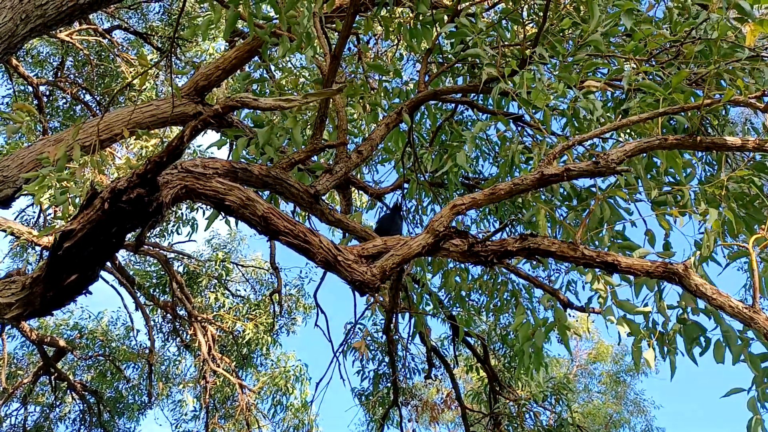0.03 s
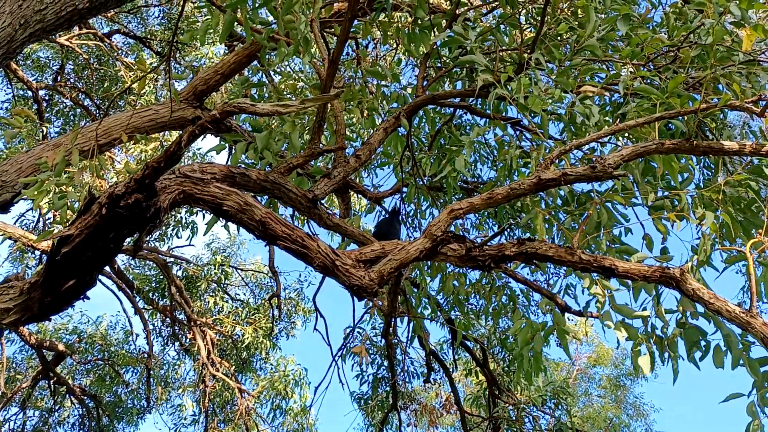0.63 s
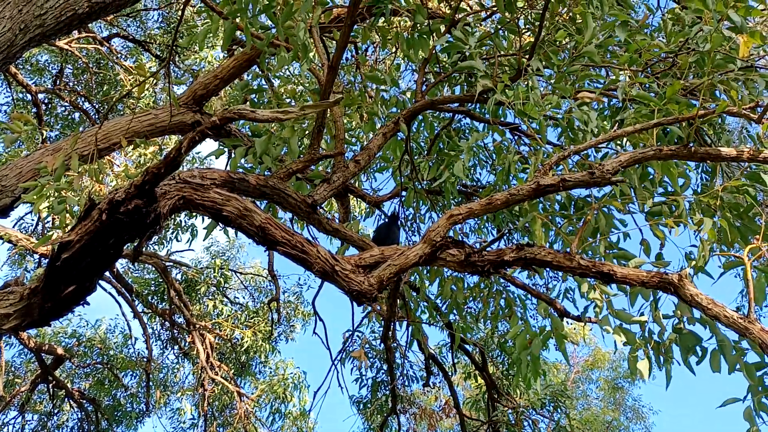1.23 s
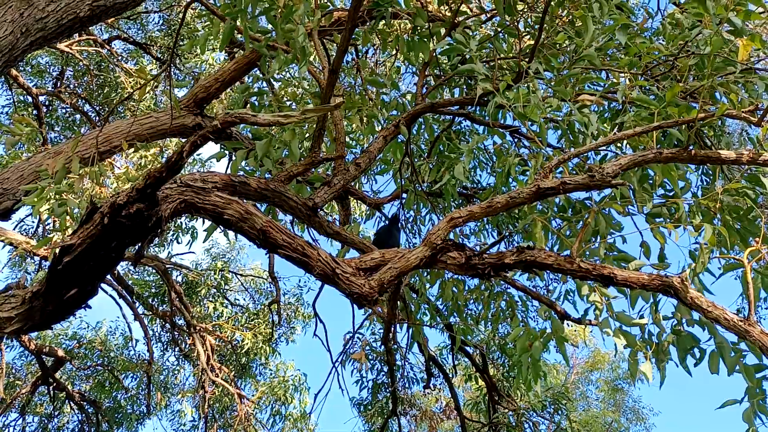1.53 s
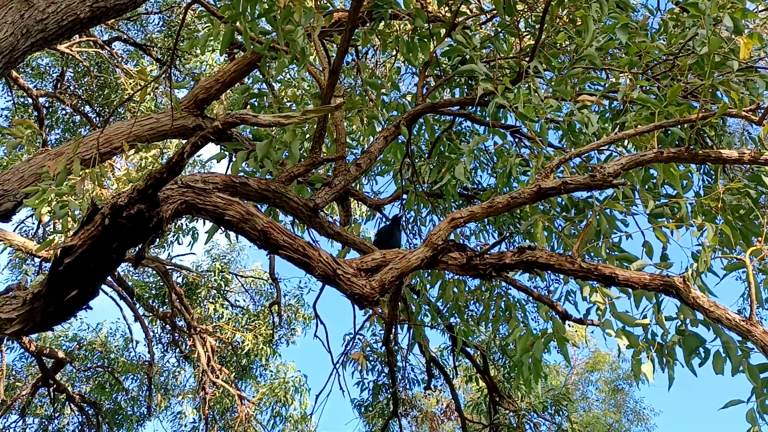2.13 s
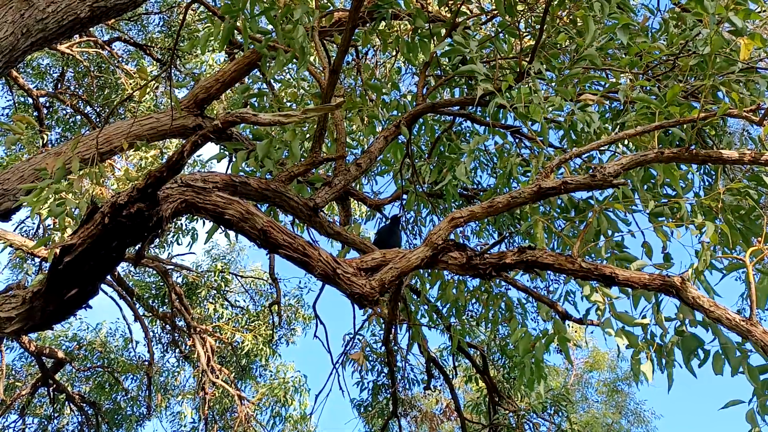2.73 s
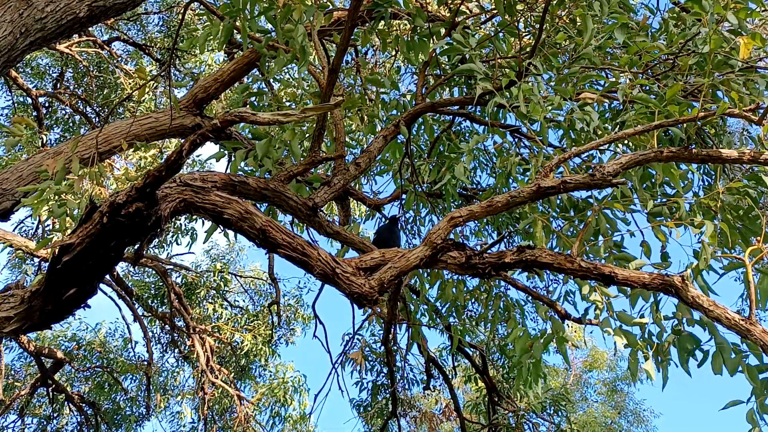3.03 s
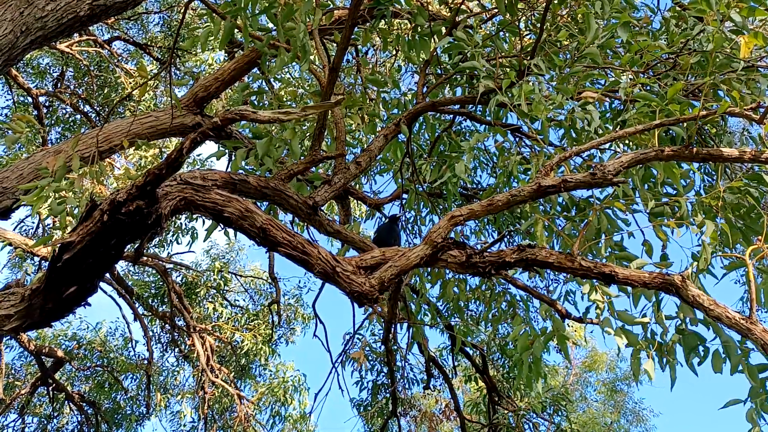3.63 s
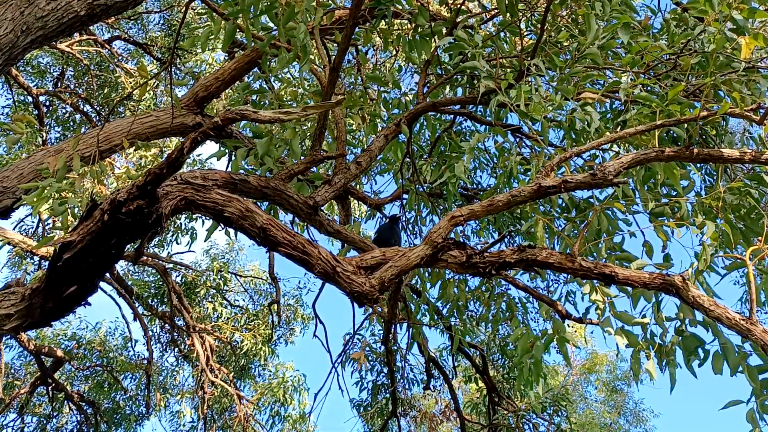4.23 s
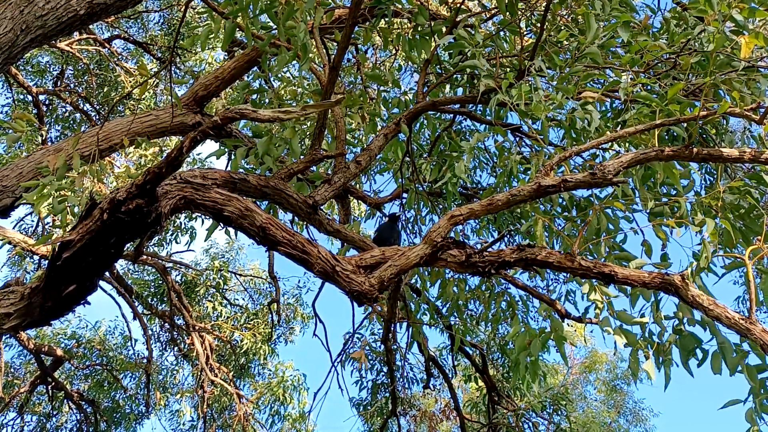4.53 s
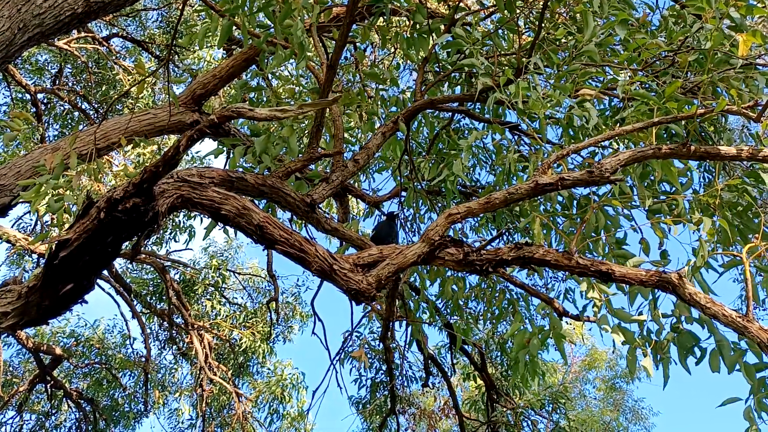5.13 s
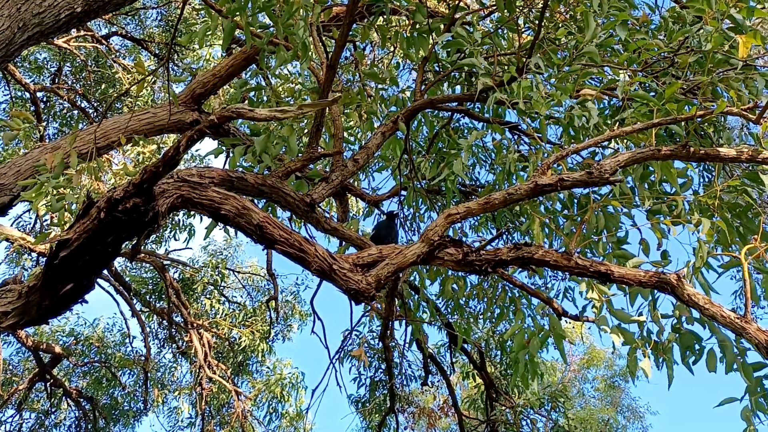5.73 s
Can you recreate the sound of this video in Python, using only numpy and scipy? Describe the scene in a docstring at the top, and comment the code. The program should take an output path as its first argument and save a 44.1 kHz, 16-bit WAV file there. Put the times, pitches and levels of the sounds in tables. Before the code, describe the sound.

Outdoors among trees, a faint rumble and soft leaf hiss run throughout. For the first two seconds, uneven low wind buffets the microphone, mostly on the left. Meanwhile parrots some way off give high hollow whistles, bent squawks and rasping screeches over distant chatter, busiest around 0.6 and loudest around 1.7 seconds, with a short echo. One shrill squeal follows at 2.3 seconds. A magpie overhead, after two faint notes near 0.5 and 1.6 seconds, starts warbling at about 2.4 seconds: low falling slides, some in two tones at once, fluttering growly notes and short pure pips. Its song is strongest from 3.3 to 5.4 seconds and continues until about 5.9. Softer parrot calls carry on behind it, with clean twitters mostly after 5 seconds. Two soft puffs of wind touch the microphone near 2.7 and 3.9 seconds.

```python
"""Magpie and parrots in the wind

A magpie warbles low sliding notes from a branch overhead, its two-sided syrinx fluttering.
Parrots whistle, squawk and screech further off among the trees, which echo them.
Wind buffets the left microphone port for two seconds, then leaves a faint rumble and two soft puffs."""
import sys
import numpy as np
from scipy import signal
from scipy.fft import rfft, irfft
from scipy.io import wavfile
from scipy.ndimage import map_coordinates

SR = 44100
rng = np.random.default_rng(int(sys.argv[2]) if len(sys.argv) > 2 else 0)


def master(y):
    """Save y as 16-bit WAV."""
    cut = np.clip(np.atleast_2d(y).T, -1, 1)
    pcm = np.round(cut * 32767)  # scale
    wavfile.write(sys.argv[1], SR, pcm.astype(np.int16))


N = 255339

# The magpie's falling two-voice slides. Each row: start, peak and end in seconds, first pitch, last
# pitch and bow in Hz, upper voice's relative level in dB, flutter amount, opening gap down to the
# lower voice in Hz, lower voice's relative level in dB.
MAGPIE_SLIDES = [(2.35, 2.45, 2.57, 1033, 731, 115, -43, 0.9, 141.8, -57.5),
                 (2.623, 2.866, 2.892, 1433, 1158, -64, -47, 0.98, 250, -39.5),
                 (3.773, 3.822, 3.89, 1340, 1121, 2, -47, 0.54, 227, -49.5),
                 (4.438, 4.624, 4.77, 1057, 804, 119.5, -41.5, 0.78, 152.3, -43.5),
                 (5.612, 5.816, 5.88, 1391, 1178, -34, -38.5, 0.77, 231.2, -43)]
# Its one-voice notes, from pure to growling. Each row: start, peak and end in seconds, first pitch,
# last pitch and bow in Hz, relative level in dB, flutter amount.
MAGPIE_NOTES = [(0.486, 0.514, 0.568, 1134, 1010, -10, -59, 0.9),
                (1.627, 1.653, 1.72, 1123, 1023, 4, -52.5, 0.82),
                (2.886, 2.896, 2.922, 1113, 1341, 27, -37.5, 0.04),
                (3.097, 3.131, 3.15, 835, 515, -7, -51, 1.7),
                (3.163, 3.29, 3.305, 706, 646, 150, -45.5, 1.4),
                (3.307, 3.348, 3.375, 1046, 939.6, -48.5, -30, 0.07),
                (3.421, 3.507, 3.63, 669, 672.5, 53, -38.5, 1.2),
                (3.889, 4.005, 4.115, 1110, 870.5, 0.5, -33.5, 0.2),
                (4.086, 4.128, 4.16, 906, 802, 1.5, -39.5, 1.08),
                (4.761, 4.811, 4.86, 743, 717, -2.5, -38, 0.48),
                (4.853, 4.887, 4.9, 707, 594, -10, -44, 1.34),
                (5.038, 5.15, 5.187, 766, 701, 74.5, -45.5, 1.7),
                (5.208, 5.381, 5.414, 962, 848, -22.5, -35, 0.39)]
# Its short pure pips. Each row: start and end in seconds, pitch in Hz, relative level in dB.
MAGPIE_PIPS = [(3.375, 3.394, 963, -37), (3.73, 3.756, 1256, -47.5), (3.753, 3.765, 1424, -48),
               (4.168, 4.208, 731, -42.5), (4.395, 4.407, 1294, -54.5), (4.421, 4.434, 1020, -48),
               (4.988, 5.022, 950, -44.5), (5.554, 5.607, 1265, -56.5), (5.585, 5.604, 657, -53.5)]
# Hollow parrot whistles. Each row: start and end in seconds, held pitch in Hz, relative level in dB.
PARROT_WHISTLES = [(0.059, 0.182, 5015, -53), (0.511, 0.588, 3606, -39), (0.592, 0.66, 4183, -35),
                   (0.683, 0.884, 4280, -51.5), (1.042, 1.122, 3620, -45), (1.149, 1.298, 3594, -40),
                   (1.685, 1.72, 4216, -26.5), (1.736, 1.865, 3836, -35.5), (1.798, 1.844, 4960, -36),
                   (1.974, 2.008, 4060, -36.5), (2.926, 3.001, 4186, -49.5), (3.502, 3.603, 4474, -47),
                   (4.1, 4.205, 4186, -49), (5.6, 5.662, 4204, -47.5)]
# Bent squawks. Each row: start and end in seconds, first pitch, last pitch and bow in Hz,
# relative level in dB, second harmonic in dB against the first.
PARROT_SQUAWKS = [(0.34, 0.383, 2614, 2330, 31, -62.5, 14), (0.425, 0.492, 2635, 2485, 175, -44, -2.5),
                  (0.545, 0.582, 2957, 2490, -130, -40, -1.5),
                  (0.634, 0.691, 3286, 3205, -100, -47.5, 11.5), (0.646, 0.73, 2590, 2940, -270, -54, 12),
                  (0.712, 0.82, 3067, 2800, -63.5, -50.5, -12), (1.382, 1.422, 2760, 2320, 158, -58.5, 8),
                  (1.461, 1.496, 2866, 2710, 49, -48.5, -4.5),
                  (1.572, 1.653, 2540, 2600, 65.5, -38.5, -2.5), (1.707, 1.741, 2777, 3085, -98, -35, 3.5),
                  (1.807, 1.847, 3170, 3620, -150, -36.5, -0.5), (2.003, 2.057, 3216, 3590, -350, -50, 6),
                  (3.167, 3.334, 2946, 2430, 114, -53, -6.5), (3.44, 3.637, 2913, 3178, 26.5, -49, -5),
                  (5.17, 5.23, 2850, 2800, -19, -57, -2), (5.355, 5.529, 2203, 2983, 169.5, -59.5, 5),
                  (5.618, 5.665, 2544, 2370, -83, -60.5, 14), (5.66, 5.741, 2640, 2663, -150, -51.5, 12)]
# Rasping screeches. Each row: start and end in seconds, centre pitch in Hz, relative level in dB,
# second harmonic in dB against the first.
PARROT_SCREECHES = [(0.652, 0.73, 3100, -50, 0), (0.918, 1.022, 2766, -45, 1.5),
                    (1.637, 1.735, 3350, -39, -6.5), (2.79, 2.998, 3637, -49.5, -11),
                    (4.036, 4.254, 3417, -50, -11), (4.577, 4.66, 2940, -59.5, -4.5)]
# One long squeal. Each row: time in seconds, pitch in Hz, relative level in dB, jitter as a share of pitch.
PARROT_SQUEAL = [(2.261, 2240, -68, 0.016), (2.294, 2526, -50.5, 0.027), (2.326, 3195, -40.5, 0.0097),
                 (2.344, 2807, -45.5, 0.082), (2.365, 2912, -45.5, 0.0083), (2.477, 2996, -48.5, 0.0069),
                 (2.522, 3242, -45, 0.0067), (2.545, 3300, -73, 0.018)]
# The nearest parrot's twitters. Each row: start and end in seconds, first pitch, last pitch and
# bow in Hz, level in dB.
PARROT_TWITTERS = [(3.472, 3.528, 3770, 4450, -600, -52), (4.605, 4.652, 1780, 1576, 6, -50),
                   (5.064, 5.119, 3420, 2320, 57, -57), (5.11, 5.149, 2370, 3160, 889, -55.5),
                   (5.159, 5.182, 4200, 3330, 530, -46), (5.243, 5.368, 3030, 3140, 65, -51.5),
                   (5.511, 5.575, 4100, 3700, -3, -60.5), (5.536, 5.622, 3025, 3010, -34, -45),
                   (5.728, 5.786, 3120, 3730, 165, -51.5)]
# Direction and brightness of the callers. Each row: time in seconds, lead at the left port in seconds,
# overtone trim in dB.
FLOCK_PERSPECTIVE = [(.5, 0.00055, -15), (2.599, 0.00067, -13.5), (2.799, 0.00019, -17.5),
                     (5.2, 0.00027, -25)]
# Colour of the parrots' overtones. Each row: frequency in Hz, gain in dB.
OVERTONE_COLOUR = [(7800, -9.5), (9500, 1.5), (12000, 0.5), (15500, -13), (18000, -69)]
# Rise and fall of the far chatter. Each row: time in seconds, level of one chirp in dB.
CHATTER_LEVELS = [(0.2, -62.5), (0.7, -53), (1.45, -60), (1.8, -53.5), (2.15, -71), (5.2, -74), (5.7, -58)]
# Echo among the trees. Each row: frequency in Hz, seconds to die away by 60 dB.
TREE_DECAY = [(800, 0.15), (3000, 0.66), (6600, 0.52), (13000, 0.49)]
# Wind on the microphone. Each row: time in seconds, relative level in dB, left minus right in dB.
WIND_GUSTS = [(0.0, -31.5, 17), (0.03, -34, -0.5), (0.18, -38, 7), (0.2, -26.5, 23), (0.239, -29, 8),
              (0.341, -43.5, 6), (0.38, -36, -5), (0.41, -35.5, 4), (0.74, -35, 2), (0.79, -38.5, -1),
              (1.01, -43.5, 2.5), (1.33, -26.5, 11), (1.377, -35.5, 18.5), (1.957, -26, 24.5),
              (2.02, -65, -9)]
# Colour of the buffeting. Each row: frequency in Hz, relative spectral density in dB.
BUFFET_COLOUR = [(30, -65), (70, -7), (115, 3.5), (230, -4), (480, -29), (1200, -69.5), (2500, -37),
                 (6000, -110)]
# Late soft puffs of wind. Each row: peak time in seconds, level in dB before panning.
WIND_PUFFS = [(2.68, -32.5), (3.886, -38)]
# Bed of air and distant rumble. Each row: frequency in Hz, relative spectral density in dB.
AIR_COLOUR = [(25, -44.5), (60, -6), (110, -3), (300, -18), (1500, -38), (4000, -29), (8500, -43.5),
              (15500, -53)]


def magpie(flutter_hz=72, swing_hz=50, rasp_hz=38, chop_depth=0.52, steadying=0.37, trim_db=1):
    """Gliding tones that each side of the syrinx chops and bends, with pure pips between them."""
    voice = np.zeros(N)
    beat = 2 * np.pi * np.cumsum(flutter_hz * (1 + .14 * wander(45))) / SR
    uneven = np.exp(.38 * wander(90))
    rasp = wander(240)
    for t, hz, peak_s, db, flutter in syrinx_glides():
        at = (np.arange(len(t)) + rng.integers(N)) % N  # each glide flutters in its own way
        effort = amp(swell(t, peak_s))
        depth = np.clip(flutter * (1 - steadying * effort), 0, 1)  # steadier at full voice
        bend_hz = rasp_hz * rasp[at] - swing_hz * np.sin(beat[at])  # pitch falls through each throb
        tone = magpie_tone(hz + depth * bend_hz)
        chop = unit_rms((1 + chop_depth * depth * np.cos(beat[at])) * uneven[at] ** depth)
        add(voice, t[0], amp(db + trim_db) * effort * chop * tone * fade(t, .01, .006))
    for start, end, hz, db in MAGPIE_PIPS:
        t = np.arange(start, end, 1 / SR)
        sag = np.linspace(1.015, .985, len(t))
        add(voice, start, amp(db + trim_db) * magpie_tone(hz * sag) * fade(t, 0.0046, 0.0064))
    return pan(voice, left_db=-1.7) + amp(-4.0) * tree_echo(voice)


def syrinx_glides(lower_late_s=0.037, gap_closing=0.171):
    """One glide per singing side of the syrinx; in a slide the lower side joins late and draws closer."""
    for start, peak_s, end, *glide, db, flutter, gap_hz, lower_db in MAGPIE_SLIDES:
        t = np.arange(start, end, 1 / SR)
        hz = bowed(t, *glide)
        lower_hz = hz - gap_hz * np.linspace(1, 1 - gap_closing, len(t))
        joined = t > start + lower_late_s
        yield t, hz, peak_s, db, flutter
        yield t[joined], lower_hz[joined], peak_s, lower_db, flutter
    for start, peak_s, end, *glide, db, flutter in MAGPIE_NOTES:
        t = np.arange(start, end, 1 / SR)
        yield t, bowed(t, *glide), peak_s, db, flutter


def magpie_tone(hz):
    """A near sine; the throat lets more of the second harmonic out on the lowest notes."""
    phase = 2 * np.pi * np.cumsum(hz) / SR
    second = amp(np.interp(hz, [680, 735, 1100], [-18, -33, -42]))
    return np.sqrt(2) * (np.sin(phase) + second * np.sin(2 * phase))


def parrots(direct_db=-3, echo_db=-2, twitter_echo_db=-8):
    """The flock reaches the left port first; the nearest bird is mostly dry, the farthest all echo."""
    calls, near = voice_calls(parrot_calls()), voice_calls(twitters())
    t = np.arange(N) / SR
    times, lead_s, _ = np.transpose(FLOCK_PERSPECTIVE)
    left = amp(direct_db) * calls + near
    right = map_coordinates(left, [(t - np.interp(t, times, lead_s)) * SR])
    echo = tree_echo(amp(echo_db) * calls + amp(twitter_echo_db) * near, early_boost=4.37)
    far = tree_echo(voice_calls(chatter()), early_boost=6)
    return np.array([left, right]) + echo + far


def parrot_calls(scoop=0.075, scoop_s=0.0149, whistle_jitter=.0062, screech_jitter=0.13):
    """Whistles that scoop up, bent squawks, rasping screeches and a squeal that cracks and holds."""
    for start, end, held_hz, db in PARROT_WHISTLES:
        t = np.arange(start, end, 1 / SR)
        hz = held_hz * (1 - scoop * np.exp((start - t) / scoop_s))
        yield t, hz, db + swell(t, t.mean()) / 2, -21, 0, whistle_jitter  # weak second harmonic: hollow
    for start, end, *glide, db, second_db in PARROT_SQUAWKS:
        t = np.arange(start, end, 1 / SR)
        yield t, bowed(t, *glide), db, second_db, 0, 2 * whistle_jitter
    for start, end, hz, db, second_db in PARROT_SCREECHES:
        t = np.arange(start, end, 1 / SR)
        yield t, hz, db + swell(t, t.mean()), second_db, -2, screech_jitter
    times, *curves = np.transpose(PARROT_SQUEAL)
    t = np.arange(times[0], times[-1], 1 / SR)
    hz, db, jitter = (np.interp(t, times, curve) for curve in curves)
    yield t, hz, db, 6.5, 0, jitter  # strong second harmonic: shrill


def voice_calls(calls, lurch=0.508):
    """The parrot voice: six harmonics on a shaking, lurching pitch; heavy jitter turns it to a rasp."""
    voices = np.zeros(N)
    tremors = np.array([wander(547), wander(67), wander(100)])
    times, _, bright_db = np.transpose(FLOCK_PERSPECTIVE)
    for t, hz, db, second_db, shine_db, jitter in calls:
        shake, waver, grain = tremors[:, (np.arange(len(t)) + rng.integers(N)) % N]
        phase = 2 * np.pi * np.cumsum(hz * (1 + jitter * (shake + lurch * waver))) / SR
        upper_db = max(second_db, 0) + shine_db + np.interp(t[0], times, bright_db)
        levels = [0, second_db] + [upper_db + curve_at(OVERTONE_COLOUR, k * hz) for k in range(3, 7)]
        tone = sum(amp(db + level) * np.sin(k * phase) for k, level in enumerate(levels, 1))
        throb = unit_rms(np.exp(np.minimum(45 * jitter, .38) * grain))
        add(voices, t[0], np.sqrt(2) * tone * throb * fade(t, .005, .006))
    return voices


def twitters(second_db=-27, jitter=0.0033):
    """The clean glides of the nearest parrot."""
    for start, end, *glide, db in PARROT_TWITTERS:
        t = np.arange(start, end, 1 / SR)
        yield t, bowed(t, *glide), db, second_db, 0, jitter


def chatter(count=170, low_hz=2050, high_hz=3300, shortest_s=0.03484, bend=0.04, dull_db=-9, rasp=0.027):
    """Random chirps from the far side of the flock, from pure to raspy."""
    for k, (when, length, height, roughness) in enumerate(rng.random((count, 4))):
        start = (k + when) * N / SR / count
        t = start + np.arange(0, shortest_s * (1 + length), 1 / SR)
        first, last, bow = bend * rng.standard_normal(3)
        hz = low_hz * (high_hz / low_hz) ** height * bowed(t, 1 + first, 1 + last, bow)
        db = np.interp(start, *np.transpose(CHATTER_LEVELS))
        yield t, hz, db, -9 * height ** 2, dull_db, rasp * roughness ** 2


def tree_echo(x, early_boost=0.43, early_s=0.0059, taps_per_s=4000):
    """Scatter from trunks and leaves: sparse taps, unrelated left and right, ringing longest at 3 kHz."""
    taps = rng.choice([-1., 1.], (2, SR)) * (rng.random((2, SR)) < taps_per_s / SR)
    hz, t, spectra = signal.stft(taps, SR, nperseg=256)
    decay = amp(-60 * t / curve_at(TREE_DECAY, hz)[:, None])
    attack = (1 - np.exp(-t / 0.0011)) * (1 + early_boost * np.exp(-t / early_s))
    tail = signal.istft(spectra * decay * attack, SR, nperseg=256)[1]
    return signal.fftconvolve(x[None], tail / np.linalg.norm(tail[0]), axes=1)[:, :N]


def wind(lumps_db=3.5, gust_db=9.0, right_darker=1.465, puff_s=0.016):
    """Lumpy turbulence, unrelated at the two ports; the sheltered right one is weaker and duller."""
    t = np.arange(N) / SR
    times, db, side_db = np.transpose(WIND_GUSTS)
    sides = pan(np.ones(N), np.interp(t, times, side_db))
    gate = np.clip((times[-1] - t) / 0.0045, 0, 1)
    gusts = amp(np.interp(t, times, db) + gust_db) * gate * sides / np.hypot(*sides)
    puffs = sum(amp(level) * np.exp(-((t - peak_s) / puff_s) ** 2) for peak_s, level in WIND_PUFFS)
    buffets = [unit_rms(noise(BUFFET_COLOUR, darker) * amp(lumps_db * wander(23.4)))
               for darker in (1, right_darker)]
    return (gusts + pan(puffs, left_db=7)) * np.array(buffets)


def air(rumble_db=-52, hiss_db=-53, split_hz=600):
    """Low rumble that swells, and the faint steady hiss of leaves and far birds."""
    shared = noise(AIR_COLOUR)
    bed = np.array([unit_rms(0.5 * shared + noise(AIR_COLOUR)) for _ in range(2)])
    rumble, hiss = (signal.sosfilt(signal.butter(3, split_hz, kind, fs=SR, output="sos"), bed)
                    for kind in ("low", "high"))
    swell_db = 4 * np.array([wander(10), wander(10)])
    return rumble * amp(rumble_db + swell_db) + hiss * amp(hiss_db + 0.74 * wander(13.0))


def bowed(t, first, last, bow):
    """A glide that bends above or below the straight line, by bow at its middle."""
    progress = (t - t[0]) / (t[-1] - t[0])
    return first + (last - first) * progress + 4 * bow * progress * (1 - progress)


def swell(t, peak_s, depth_db=12, curve=1.78):
    """Level in dB of a note that grows to its peak and ebbs."""
    before = np.clip((peak_s - t) / (peak_s - t[0]), 0, 1)
    after = np.clip((t - peak_s) / (t[-1] - peak_s), 0, 1)
    return -depth_db * (before ** curve + after ** curve)


def fade(t, rise_s, fall_s):
    """Soft attack and release of a note."""
    ramp = np.minimum((t - t[0]) / rise_s, (t[-1] - t) / fall_s)
    return np.sin(np.pi / 2 * np.clip(ramp, 0, 1)) ** 2


def noise(colour, darker=1):
    """Coloured noise of rms 1, its spectrum moved down in frequency by the factor darker."""
    gain = amp(curve_at(colour, darker * np.fft.rfftfreq(N, 1 / SR)))
    return unit_rms(irfft(rfft(rng.standard_normal(N)) * gain, N))


def wander(rate_hz):
    """Random drift of rms 1, rolled off above the rate."""
    hz = np.fft.rfftfreq(N, 1 / SR)
    return unit_rms(irfft(rfft(rng.standard_normal(N)) / (1 + (hz / rate_hz) ** 4), N))


def curve_at(points, hz):
    """Reads a table on a log-frequency axis."""
    point_hz, values = np.transpose(points)
    return np.interp(np.log(hz + 1), np.log(point_hz), values)


def pan(x, left_db):
    """Spreads a sound to the two ports, the left one left_db above the right."""
    return np.array([x * amp(left_db / 2), x * amp(-left_db / 2)])


def add(mix, start_s, sound):
    """Drops a sound into the mix."""
    part = mix[max(0, round(start_s * SR)):][:len(sound)]
    part += sound[:len(part)]


def amp(db):
    """Decibels to gain."""
    return 10 ** (np.asarray(db) / 20)


def unit_rms(x):
    """Scales to rms 1."""
    return x / np.sqrt(np.mean(x ** 2) + 1e-20)


def scene():
    """Birds and wind over a bed of air."""
    return magpie() + parrots() + wind() + air()


def record(dry):
    """A steep low-pass trims the top at 15.8 kHz."""
    lowpass = signal.firwin(511, 15800, window=("kaiser", 9), fs=SR)
    return signal.oaconvolve(dry, lowpass[None], "same")


dry = scene()
out = record(dry)
master(out)
```